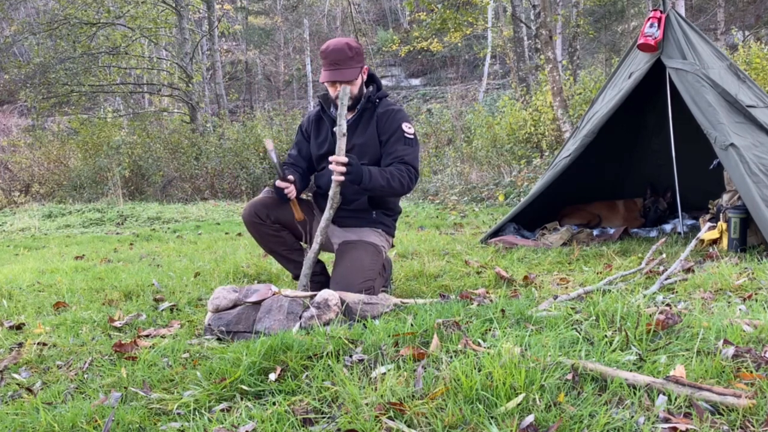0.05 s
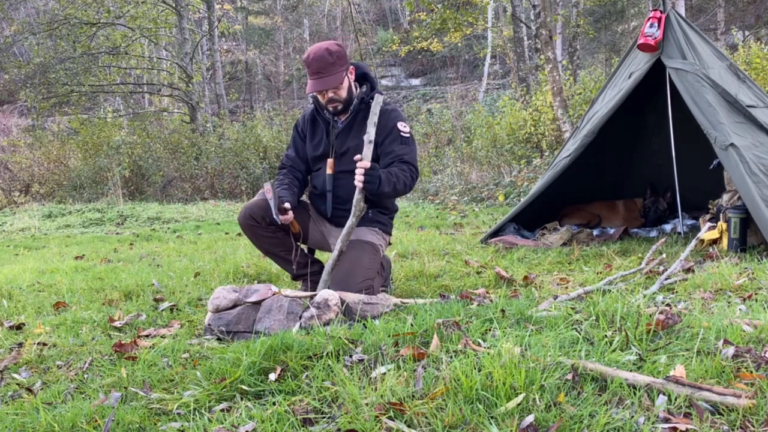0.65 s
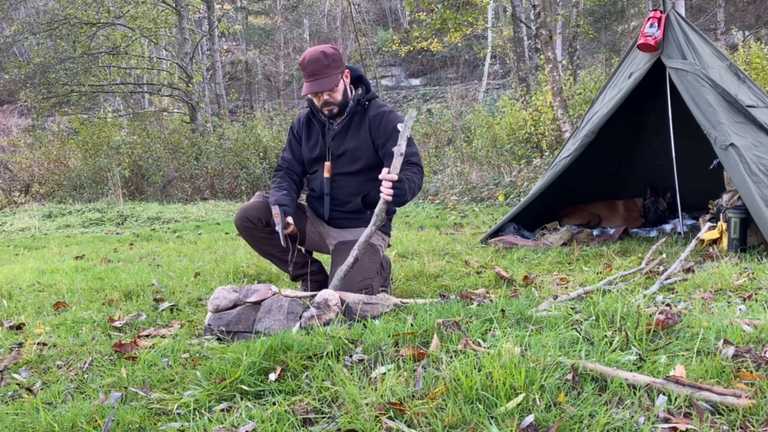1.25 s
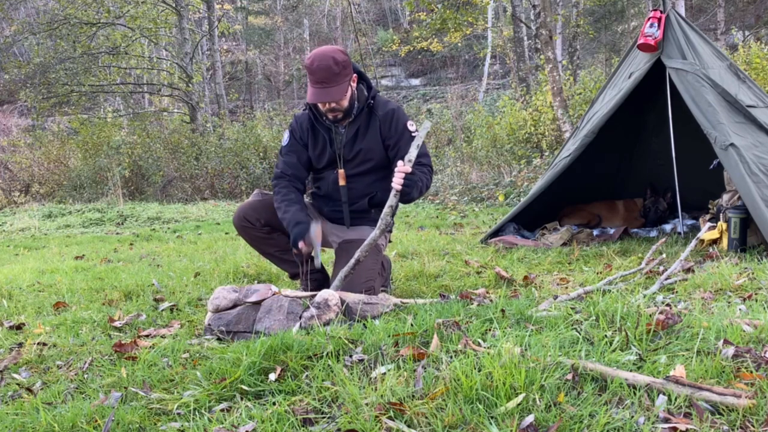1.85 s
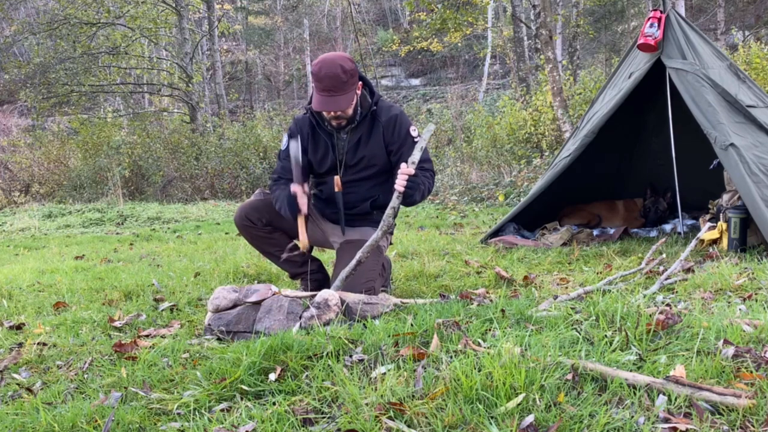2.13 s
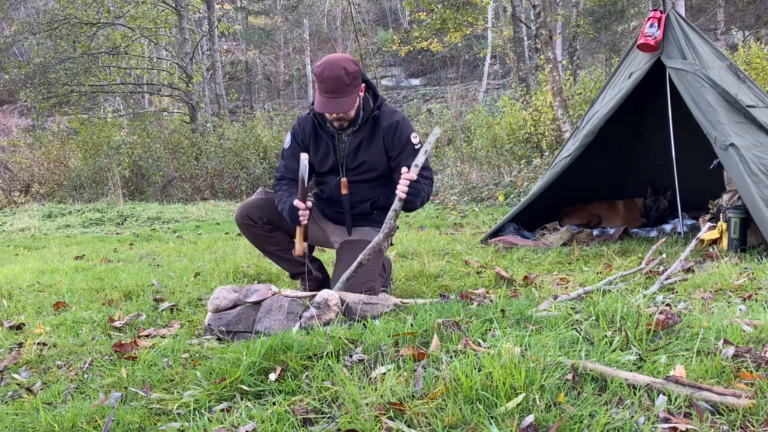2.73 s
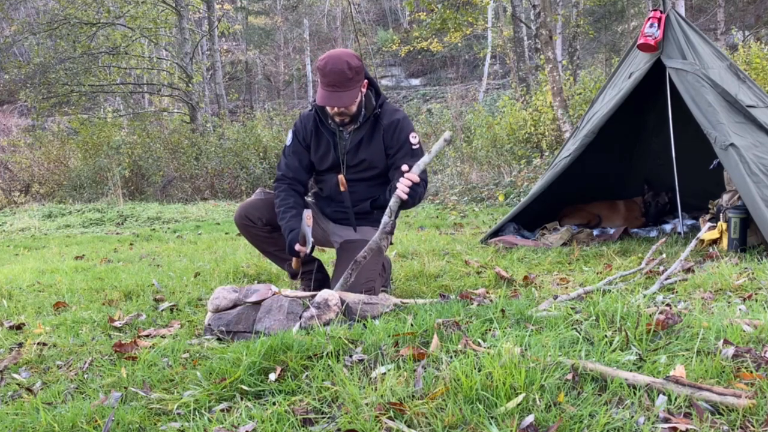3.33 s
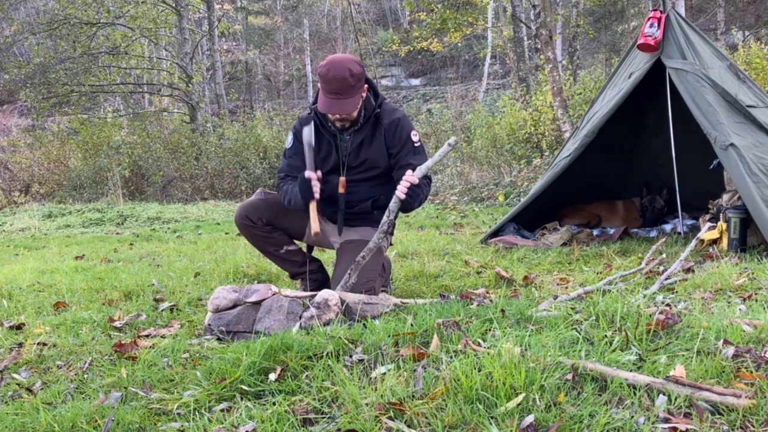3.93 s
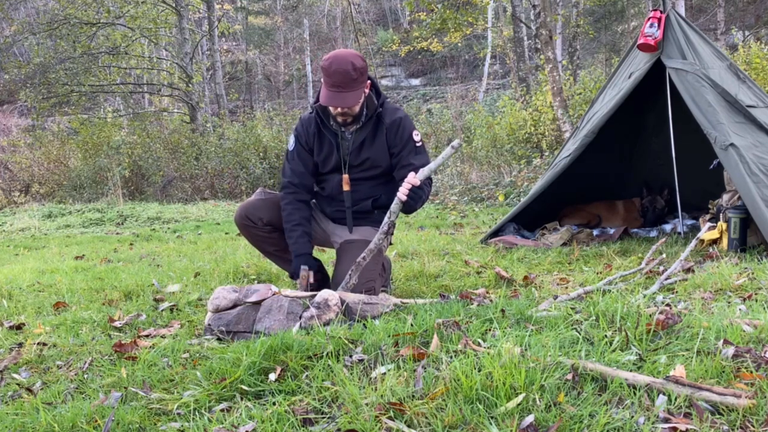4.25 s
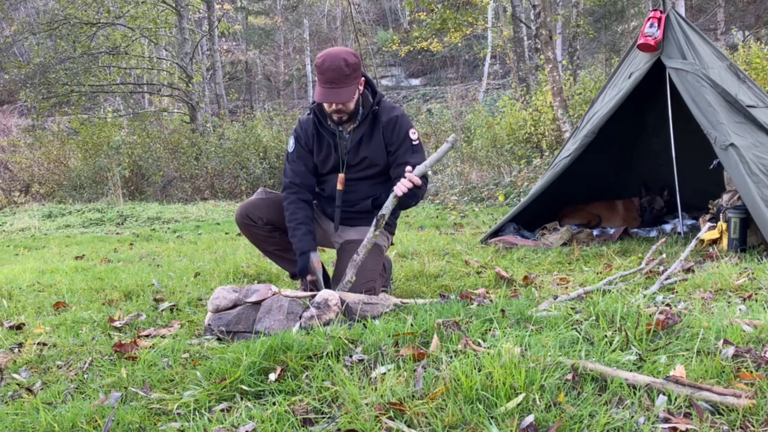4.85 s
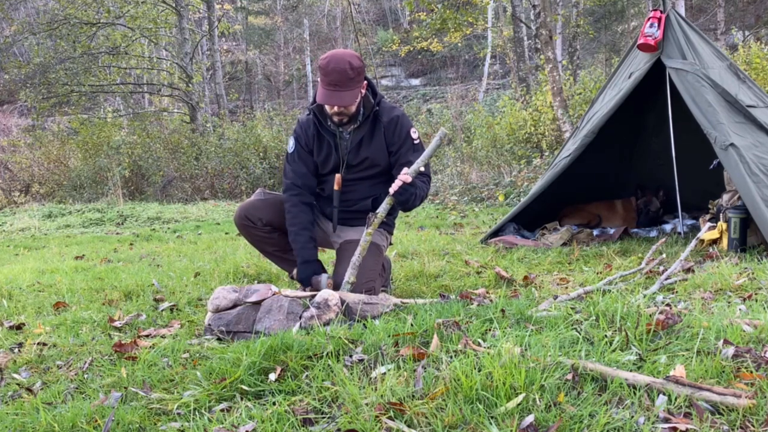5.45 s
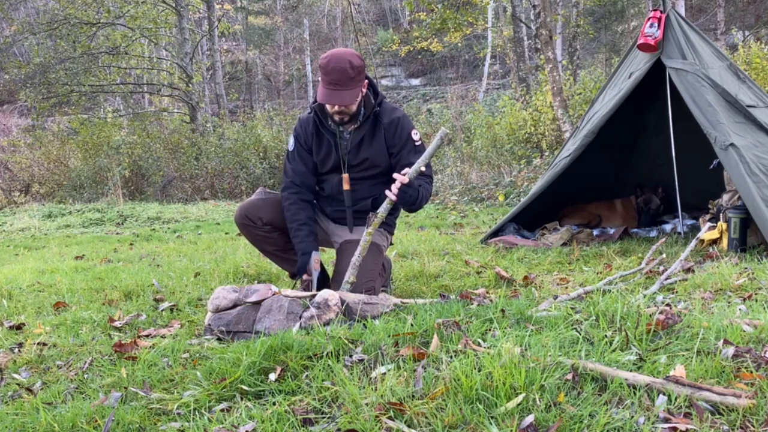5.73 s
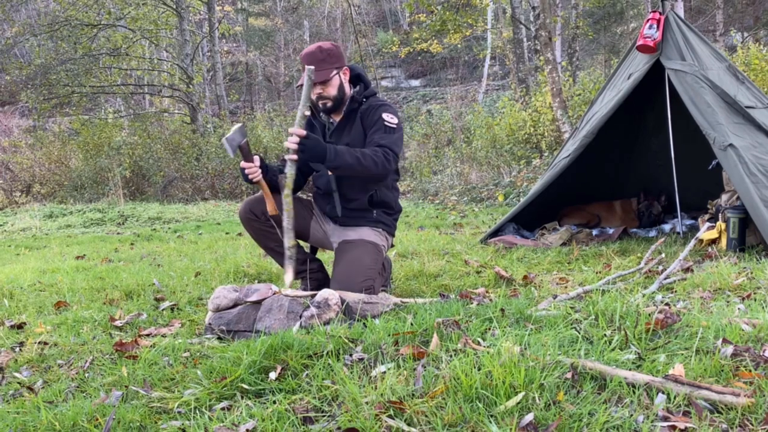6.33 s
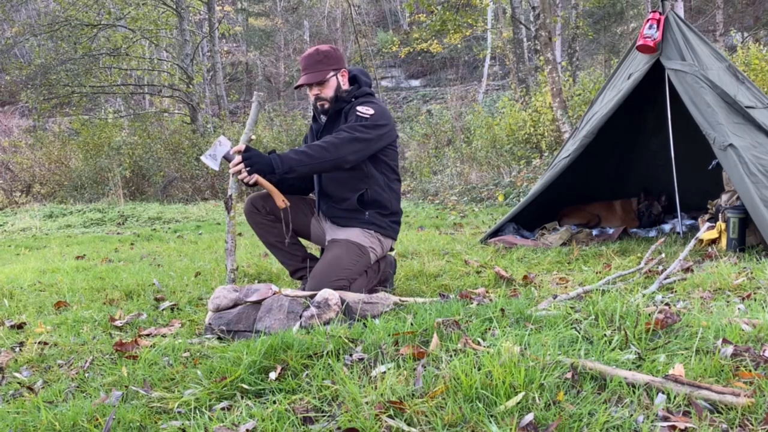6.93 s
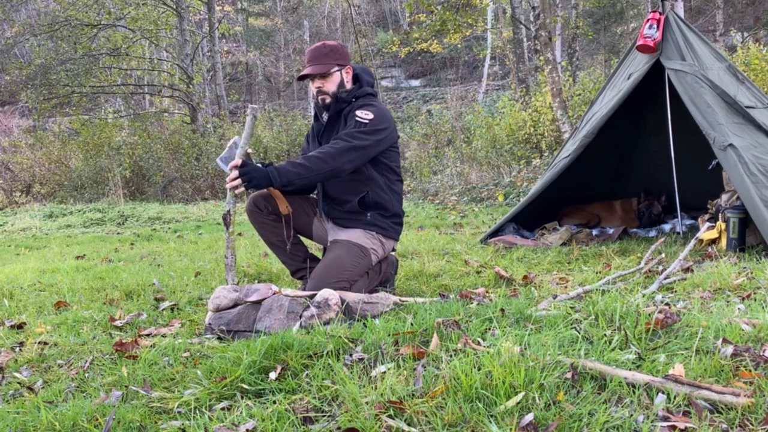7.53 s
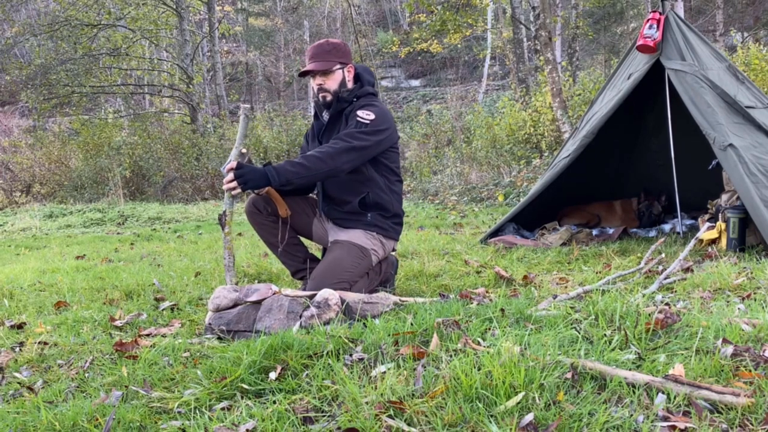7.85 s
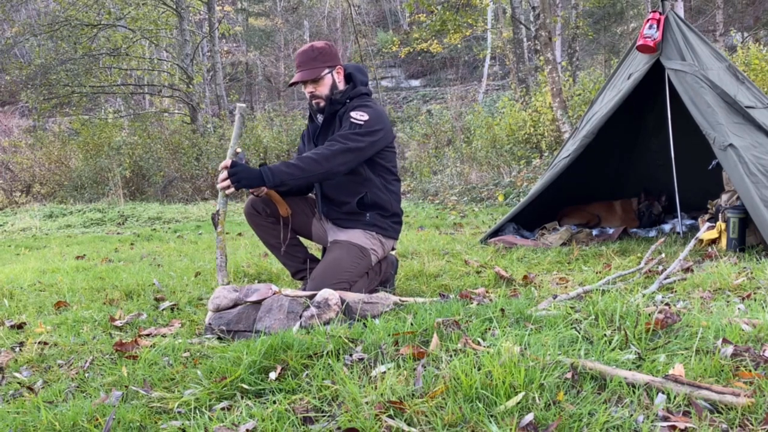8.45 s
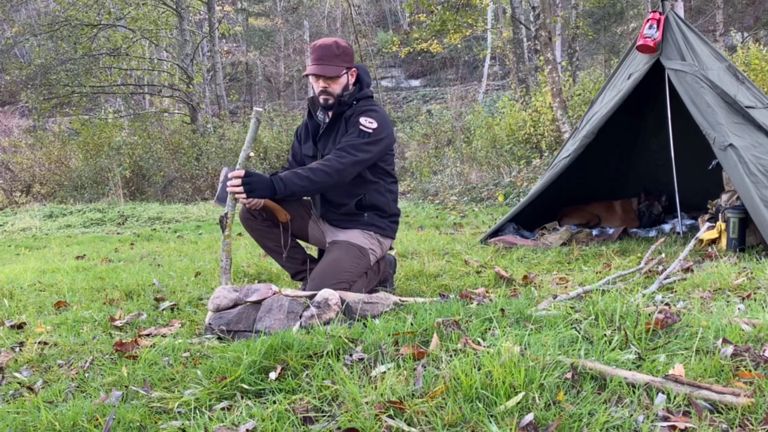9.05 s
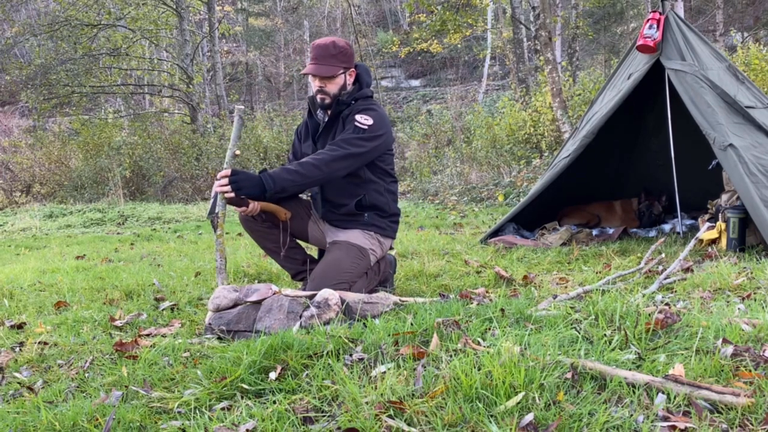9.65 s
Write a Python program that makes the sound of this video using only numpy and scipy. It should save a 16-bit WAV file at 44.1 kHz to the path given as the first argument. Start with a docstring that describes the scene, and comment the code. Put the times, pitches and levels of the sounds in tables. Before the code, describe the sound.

Small birds chatter faintly throughout in short, high phrases, echoing in the trees at the edge of a wood, over a soft, steady far rumble and airy hiss. A tiny tick comes at about 1.2 seconds and a quiet sleeve swish at 1.5. Close to the stereo microphone, a hatchet then chops the end of a stick against a log four times, at about 2.3, 2.9, 4.1 and 5.4 seconds. These blows are by far the loudest sounds, each a sharp knock, a crack of snapping fibres and a dull thump, with a short outdoor echo. Between them the blade ticks and scrapes lightly, nudging the log around 3.5 and 4.9 seconds. A last faint scrape comes near 5.9. A bigger bird calls softly far off around 1.7 and 7.1 seconds. From 6 seconds until the end, near 10, only birds and open air remain.

```python
"""Small birds chatter in echoing trees over a soft far rumble, heard from a lawn at the edge of a wood.
Close to the stereo microphone a hatchet chops the end of a stick against a log: four blows, each a
knock of the edge, a crack of snapping fibres and a thump as the log is driven into the turf.
A sleeve swishes before the first blow, the blade ticks and scrapes, and a bigger bird calls far off."""
import sys
import numpy as np
from scipy import signal
from scipy.fft import rfft, irfft, next_fast_len
from scipy.io import wavfile

SR = 44100
rng = np.random.default_rng(int(sys.argv[2]) if len(sys.argv) > 2 else 0)


def output_pcm(signal):
    """Save a mono or channel-first signal as 16-bit PCM at the path in sys.argv[1].

    Samples are clipped to [-1, 1] before scaling.
    """
    pcm = np.clip(np.atleast_2d(signal).T, -1, 1) * 32767
    wavfile.write(sys.argv[1], SR, np.round(pcm).astype(np.int16))


N = 427753

# full blows, close up: start_s, knock_db, crack_after_s, crack_half_s, crack_db, crack_hz,
# crack_width_ratio, splinter_db, stop_db, shudder_hz, thump_after_s, thump_db, push_s
CHOPS = [(2.2562, -18.5, 0.0063, 0.0025, -16.5, 2360, 1, -1.5, -29.5, 264, 0.0097, -15, .0087),
         (2.9015, -17.5, .0066, 0.0017, -14.5, 3020, 1, -1.5, -23, 180, 0.014, -19, .0026),
         (4.0901, -18.5, .0069, .0021, -15.5, 3540, .8, 0.5, -24, 245, .0195, -15, 0.008),
         (5.4294, -16, .0088, .0015, -6.5, 2900, 0.27, -4, -29.5, 125, .011, -16.5, 0.0055)]
# light touches of blade or stick: time_s, half_length_s, level_db, pitch_hz, splinter_db
TAPS = [(1.181, 0.0036, -52, 3300, 3.5), (2.252, 0.00066, -28, 2600, -5.5), (3.009, 0.00055, -33, 2760, -6),
        (3.375, 0.0027, -41, 2230, -2), (3.548, .0028, -40.5, 450, -10), (4.403, 0.0011, -54, 6030, 2),
        (4.903, 0.0045, -46.5, 2160, -3), (5.406, .0014, -37.5, 2480, 1)]
# touches that also rock the log: time_s, level_db, push_s
NUDGES = [(3.548, -35, .0025), (4.903, -45.5, 0.0021), (5.409, -41, .001)]
# blade dragged through fibres and over bark: start_s, length_s, level_db
SCRAPES = [(2.924, 0.02, -38), (2.968, 0.063, -54), (4.123, .19, -58), (4.396, 0.037, -53.5),
           (4.421, 0.087, -57), (5.84, 0.12, -61)]
# resonances of stick and hatchet head: pitch_hz, width_hz, gain_db
STICK_MODES = [(480, 56, 5), (630, 160, -0.5), (1267, 28, -1.5), (1460, 120, 0.5), (1740, 210, -1),
               (2110, 150, -0.5), (3090, 780, 3), (3450, 200, -3), (5040, 1400, -2), (7180, 210, -3),
               (11130, 80, -2)]
# modes of the log on the ground: pitch_hz, gain_db, t60_s
LOG_MODES = [(61.7, -17.5, 0.21), (92, -13.5, 0.14), (149, -1, 0.086), (244, -3.5, 0.068),
             (292, -10.5, 0.075), (478, 0.5, 0.046), (610, -1.5, .05)]
# sleeve sliding over the knee as the hatchet is lowered: fastest_s, level_db
SLEEVE_SLIDES = [(1.516, -51)]
# spectrum of cloth rubbing on cloth: frequency_hz, density_db
CLOTH_SPECTRUM = [(500, -25), (900, -12), (1350, -1.5), (1900, -2.5), (2800, 0), (4000, -6), (6000, -10.5),
                  (8500, -15), (10500, -16.5), (15000, -19)]

# glides of the birds' notes: offset_s, pitch_ratio, amplitude_ratio
WHISTLE_SHAPE = [(-.032, 1.03, 0), (-.012, 1.005, 1), (.012, .995, .9), (.026, .985, 0)]
ARCH_SHAPE = [(-.018, .72, 0), (-.011, .87, .4), (-.005, .99, .9), (0, 1, 1), (.007, .94, .8),
              (.014, .8, .35), (.02, .72, 0)]
RISE_SHAPE = [(-.028, .82, 0), (-.017, .87, .7), (-.006, .96, 1), (.002, 1.02, 1), (.01, 1.04, .6),
              (.02, .88, .4), (.036, .7, 0)]
PEAK_SHAPE = [(-.022, .62, 0), (-.014, .81, .7), (-.006, .93, .9), (0, 1.02, 1), (.005, .88, .9),
              (.013, .77, .9), (.035, .67, 0)]
SLUR_SHAPE = [(-.016, .7, 0), (-.006, .9, .4), (0, 1.02, .9), (.012, .89, 1), (.03, .85, .7),
              (.046, .86, 0)]
FAR_SHAPE = [(-.05, .985, 0), (-.02, 1, 1), (.02, 1.003, .9), (.06, .99, 0)]
# the flock's two phrases: shape, after_accent_s, pitch_hz, level_db, overtone_db
LONG_PHRASE = [(WHISTLE_SHAPE, -.105, 6450, -11, -16), (SLUR_SHAPE, -.079, 4700, -5.5, -11),
               (WHISTLE_SHAPE, -0.03, 6020, -7.5, -24), (PEAK_SHAPE, 0, 4500, -1.2, -9),
               (WHISTLE_SHAPE, .027, 4800, -3.3, -43), (RISE_SHAPE, 0.059, 3760, -.5, -22.5),
               (WHISTLE_SHAPE, .078, 4650, -7, -30)]
SHORT_PHRASE = [(WHISTLE_SHAPE, -.036, 5780, -10, -33.5), (ARCH_SHAPE, 0, 5200, -.5, -23),
                (WHISTLE_SHAPE, .048, 5850, -13.5, -30), (RISE_SHAPE, .092, 3900, -11, -26)]
# when each phrase is sung in the trees: accent_s, level_db, pitch_ratio, hoarse_db
LONG_CALLS = [(1.605, -47.5, 0.96, -1), (2.65, -47.5, 1, 0), (3.65, -46.5, 1.005, 1), (4.805, -48, 0.99, 1),
              (5.65, -47, 0.98, -1), (6.209, -50.5, .99, 4), (6.61, -49, .995, -1),
              (7.808, -48.5, 0.97, -1), (9.088, -45.5, 1.005, -.5), (9.448, -49, .99, -1.5)]
SHORT_CALLS = [(.136, -57, .92, 6.5), (.658, -57.5, 0.99, 0.5), (1.162, -55, .98, 4.5),
               (2.03, -53, 0.97, -1), (2.382, -52, 1, -3), (2.776, -50, 1.02, -3.5),
               (3.265, -51.5, 0.99, 0), (4.681, -59, 0.97, 3), (5.24, -58.5, 1.02, 2), (5.96, -59, 1.03, 3),
               (6.896, -51.5, 1.06, -1), (7.503, -51, 0.97, -5), (8.226, -51, 1.02, -3.5)]
# hoarse hiss in a bird's voice: frequency_hz, density_db
RASP_SPECTRUM = [(1200, -30), (2200, -12.5), (3200, -1.5), (4800, 6), (6500, -3), (9000, -16),
                 (11000, -21.5), (15000, -14.5)]
# soft calls of the bigger bird, far off: middle_s, pitch_hz, level_db
FAR_CALLS = [(1.72, 1690, -55.5), (1.81, 1680, -66), (7.125, 1570, -62), (7.175, 1700, -66),
             (6.5, 1040, -69)]
# far rumble and open air: frequency_hz, density_db
AIR_SPECTRUM = [(20, -9), (45, -2.5), (75, 4.5), (130, -7.5), (250, -11), (500, -17.5), (1000, -20),
                (2000, -28.5), (4500, -29), (7000, -36), (10000, -42), (15000, -44.5)]
# the air reaches the microphone from all round: frequency_hz, side_to_mid_db
AIR_WIDTH = [(60, -12), (130, -9), (290, -11.5), (640, -9), (1410, -10), (3100, -7.5), (6820, -4.5),
             (15000, 3.5)]

# echoes off the near ground and a tent, the trees, and the branches round the birds:
# frequency_hz, level_db, t60_s
NEAR_ECHO = [(99.1, -18.5, 0.9), (400, -9, 0.053), (1200, -20, 0.25), (3000, -12.5, 0.092),
             (6870, -17, 0.14), (14000, -12, 0.21)]
FOREST_ECHO = [(100, -15, .7), (400, -29.5, 0.53), (1200, -32.5, 1), (3000, -20, 0.26), (7120, -20, 0.3),
               (14000, -32.5, 0.54)]
CANOPY_ECHO = [(1025, -1, 0.18), (4000, -7, 0.76), (9000, -1.5, 0.29)]
# phase lead of the left microphone port, from the log and from the trees: frequency_hz, lead_rad
LOG_PHASE = [(100, .15), (1400, .25), (4500, .8), (6700, -.2), (8000, -1.6), (8450, -3.1), (10000, -6.3),
             (11900, -9.4), (14000, -12.5), (16000, -16.3)]
TREE_PHASE = [(1000, .1), (3000, .25), (5000, .45), (9000, .5), (15000, 1.2)]


def contacts():
    """Edge meets wood in light taps, and in chops that knock, tear, crack, stop and shudder."""
    # each row: time_s, half_length_s, level_db, pitch_hz, splinter_db, width_ratio
    rows = [(*tap, .64) for tap in TAPS]
    for (s, knock_db, crack_after, crack_half, crack_db, crack_hz, crack_width,
         splinter_db, stop_db, shudder_hz, thump_after, thump_db, _) in CHOPS:
        knock = (s, .0014, knock_db, 540.4, -6, .6)  # the edge lands
        tear = (s + .36 * crack_after, .0019, crack_db - 10, 1400, 2.5, .45)  # fibres start to give
        crack = (s + crack_after, crack_half, crack_db, crack_hz, splinter_db, crack_width)
        stop = (s + .0135, .0026, stop_db, 560, -4.5, .9)  # the blade comes to rest
        shudder = (s + thump_after + .003, .006, thump_db - 13.5, shudder_hz, -23, .6)  # the stick shakes
        rows += [knock, tear, crack, stop, shudder]
    return rows


def bites(ringing, least_width=0, splinter_low_hz=3500, splinter_top_hz=11000, grain_db=4.0):
    """Each bite is a swell of snapping fibres: a body round one pitch, and bright splinters above it."""
    out, t = np.zeros(N), np.arange(-SR // 50, SR // 12) / SR
    for s, half_s, db, hz, splinter_db, width_ratio in contacts():
        swell = np.exp(-.5 * (t / half_s) ** 2)
        swell *= np.clip(t / half_s + 2.8, 0, 1)  # silent until the edge lands
        snaps = swell * rng.standard_normal(len(t)) * from_db(grain_db * rng.standard_normal(len(t)))
        body = resonance(snaps, hz, max(width_ratio, least_width) * hz)
        body = stick(butter(body, 3.3 * hz, "low"), ringing)
        splinters = butter(snaps, splinter_low_hz, "high")
        splinters = stick(butter(splinters, splinter_top_hz, "low", order=1), ringing)
        sound = rms_one(body) + from_db(splinter_db) * rms_one(splinters)
        add(out, s + t[0], from_db(db) * sound * np.sqrt(np.mean(swell ** 2)))
    return out


def stick(x, ringing, grip_spread=.006):
    """Stick and hatchet head ring when excited; the grip shifts their resonances a little each time."""
    shifts = np.exp(grip_spread * rng.standard_normal(len(STICK_MODES)))
    modes = (from_db(db) * resonance(x, hz * shift, width_hz)
             for (hz, width_hz, db), shift in zip(STICK_MODES, shifts))
    return x + ringing * sum(modes)


def log_thumps(jolt_db=-12.5, jolt_s=.002):
    """Half-sine pushes rock the log; the longer the push, the duller the thump."""
    pushes = list(NUDGES)
    for s, knock_db, *_, thump_after, thump_db, push_s in CHOPS:
        pushes.append((s, knock_db + jolt_db, jolt_s))  # a chop jolts the log on landing,
        pushes.append((s + thump_after, thump_db, push_s))  # then drives it into the turf
    force, out = np.zeros(N), np.zeros(N)
    for s, db, push_s in pushes:
        push = np.sin(np.linspace(0, np.pi, int(push_s * SR) + 3))
        add(force, s - push_s / 2, from_db(db) * push / push.sum())
    for hz, db, t60 in LOG_MODES:
        radius = np.exp(-np.log(1000) / (t60 * SR))
        pole_real = radius * np.cos(2 * np.pi * hz / SR)
        mode = signal.lfilter([1, -pole_real], [1, -2 * pole_real, radius ** 2], force + 1e-18)
        out += from_db(db) * mode
    return butter(out, 35, "high")


def blade_scrapes(grain_db=3.5, band_hz=(2000, 13000)):
    """Wood and bark give way under the edge in dense uneven grains."""
    out = np.zeros(N)
    for s, length_s, db in SCRAPES:
        size = int(length_s * SR)
        grains = rng.standard_normal(SR)[:size] * from_db(grain_db * drift(987, SR)[:size])
        sound = stick(butter(grains, band_hz, "band"), ringing=.5)
        add(out, s, from_db(db) * rms_one(sound) * signal.windows.tukey(size, .5))
    return out


def sleeve(swell_s=.1, fade_s=.088, grain_db=1.5):
    """Close by, fine weave rubs in a swish that swells and fades with the speed of the arm."""
    t, speed = np.arange(N) / SR, np.zeros(N)
    for s, db in SLEEVE_SLIDES:
        speed += from_db(db) * np.exp(-.5 * ((t - s) / np.where(t < s, swell_s, fade_s)) ** 2)
    return speed * rms_one(coloured_noise(CLOTH_SPECTRUM) * from_db(grain_db * drift(300, N)))


def birds(far_gain_db=.5, direct_gain_db=4.0):
    """A flock trades two phrases in the trees; a bigger, distant bird arrives only as echo."""
    flock = sing(LONG_PHRASE, LONG_CALLS, waver=.035) + sing(SHORT_PHRASE, SHORT_CALLS, waver=.026)
    far_bird = np.zeros(N)
    for s, hz, db in FAR_CALLS:
        call = bird_note(FAR_SHAPE, hz, overtone_db=-24, waver=.025)
        add(far_bird, s + FAR_SHAPE[0][0], from_db(db + far_gain_db) * call)
    return from_db(direct_gain_db) * trunks(flock) + echo(flock + far_bird, CANOPY_ECHO, build_s=.012)


def sing(phrase, calls, waver, rasp_db=-11.5, spread_s=.003, spread_ratio=.016, spread_db=1.7):
    """One phrase at each call, no note twice alike; a hoarser call has more overtones and more hiss."""
    tones, hoarseness = np.zeros(N), np.zeros(N)
    for s, call_db, pitch, hoarse_db in calls:
        for shape, after_s, hz, db, overtone_db in phrase:
            late_s, sharp, louder_db = rng.standard_normal(3) * [spread_s, spread_ratio, spread_db]
            start = s + after_s + late_s + shape[0][0]
            gain = from_db(call_db + db + louder_db)
            note = bird_note(shape, hz * (pitch + sharp), overtone_db + hoarse_db, waver)
            add(tones, start, gain * note)
            add(hoarseness, start, gain * from_db(hoarse_db) * np.hanning(SR // 15))
    return tones + from_db(rasp_db) * hoarseness * coloured_noise(RASP_SPECTRUM)


def bird_note(shape, hz, overtone_db, waver):
    """A tone glides along its shape with a quick quaver, and carries two weaker overtones."""
    s, pitch, amplitude = np.transpose(shape)
    t = np.arange(s[0], s[-1], 1 / SR)
    quaver = 1 + waver * drift(1100, SR // 4)[:len(t)]
    flutter = from_db(2 * drift(600, SR // 4)[:len(t)])
    phase = 2 * np.pi * np.cumsum(hz * np.interp(t, s, pitch) * quaver) / SR
    overtones = from_db(overtone_db) * (np.sin(2 * phase) + from_db(-15) * np.sin(3 * phase))
    return np.interp(t, s, amplitude) * flutter * (np.sin(phase) + overtones)


def trunks(x, echo_db=-11.5, count=6):
    """Nearby trunks throw back a few distinct copies within some tens of milliseconds."""
    out = x.copy()
    for delay_s in np.linspace(.006, .036, count) + rng.uniform(-.002, .002, count):
        add(out, delay_s, from_db(echo_db) * x)
    return out / np.sqrt(1 + count * from_db(echo_db) ** 2)


def echo(x, table, build_s):
    """Countless small reflections build up, then die away octave by octave."""
    t, response = np.arange(SR) / SR, np.zeros(SR)
    white, hz = rfft(rng.standard_normal(SR)), np.fft.rfftfreq(SR, 1 / SR)
    for low_hz in 32 * 2. ** np.arange(9):
        centre_hz = low_hz * np.sqrt(2)
        t60 = at_hz(table, centre_hz, column=2)
        envelope = np.exp(-np.log(1000) * t / t60) * (1 - np.exp(-t / build_s))
        band = irfft(white * (hz >= low_hz) * (hz < 2 * low_hz), SR)
        response += from_db(at_hz(table, centre_hz)) * band * envelope / np.linalg.norm(envelope)
    return signal.fftconvolve(x, response)[:N]


def air(mid_db=-55, waver_db=.84):
    """The far rumble and hiss swell very gently, nearly alike on both sides in the bass."""
    side = shaped(coloured_noise(AIR_SPECTRUM), lambda hz: from_db(at_hz(AIR_WIDTH, hz)))
    swell = from_db(mid_db + waver_db * drift(4, N))
    return swell * (coloured_noise(AIR_SPECTRUM) + np.array([side, -side]))


def microphone(x, phase_lead):
    """Two close ports hear one direction equally loud, but part in phase in the treble."""
    return shaped(x, lambda hz: np.exp(.5j * at_hz(phase_lead, hz) * np.array([[1], [-1]])))


def from_db(db):
    """Decibels to gain."""
    return 10 ** (np.asarray(db) / 20)


def rms_one(x):
    """Scale to rms 1."""
    return x / np.sqrt(np.mean(x ** 2) + 1e-20)


def at_hz(table, hz, column=1):
    """Read a column of a table on a log-frequency axis."""
    table = np.array(table)
    return np.interp(np.log(np.maximum(hz, 1)), np.log(table[:, 0]), table[:, column])


def add(track, s, sound):
    """Mix a sound into a track from time s on."""
    i = max(0, int(s * SR))
    track[i:i + len(sound)] += sound[:len(track) - i]


def butter(x, hz, kind, order=2):
    """Butterworth filter."""
    return signal.sosfilt(signal.butter(order, np.clip(hz, 10, .48 * SR), kind, fs=SR, output="sos"), x)


def resonance(x, hz, width_hz):
    """Two-pole resonance with gain 1 at its peak."""
    return signal.lfilter(*signal.iirpeak(hz, hz / min(width_hz, SR / 4), fs=SR), x + 1e-18)


def shaped(x, gain_at):
    """Filter by a gain given as a function of frequency."""
    size = next_fast_len(N, real=True)
    return irfft(rfft(x, size) * gain_at(np.fft.rfftfreq(size, 1 / SR)), size)[..., :N]


def coloured_noise(spectrum):
    """Steady noise with the given spectral shape, rms 1."""
    return rms_one(shaped(rng.standard_normal(N), lambda hz: from_db(at_hz(spectrum, hz))))


def drift(rate_hz, size):
    """Random wander of spread about 1."""
    steps = np.arange(size) * rate_hz / SR
    count = int(steps[-1]) + 2
    return np.interp(steps, np.arange(count), rng.standard_normal(count))


def scene():
    """Hatchet and sleeve near the microphone, birds and echo from the trees, air all round."""
    thumps, scrapes = log_thumps(), blade_scrapes()
    direct = bites(ringing=.9) + thumps + scrapes
    # the surroundings return the crack from all directions, so the stick's resonances blur in the echo
    blurred = sum(bites(ringing=.15, least_width=.8) for _ in range(2)) / np.sqrt(2)
    scattered = blurred + thumps + scrapes
    near = direct + sleeve() + echo(scattered, NEAR_ECHO, build_s=.0087)
    far = echo(scattered, FOREST_ECHO, build_s=.035) + birds()
    return microphone(near, LOG_PHASE) + microphone(far, TREE_PHASE) + air()


def record(dry, rolloff_hz=13500, ceiling=.92, cutoff_hz=15300):
    """The treble rolls off gently, peaks clip just under full scale, then the top is cut steeply."""
    clipped = np.clip(butter(dry, rolloff_hz, "low"), -ceiling, ceiling)
    return signal.sosfilt(signal.ellip(10, .1, 80, cutoff_hz, fs=SR, output="sos"), clipped)


dry = scene()
out = record(dry)
output_pcm(out)
```